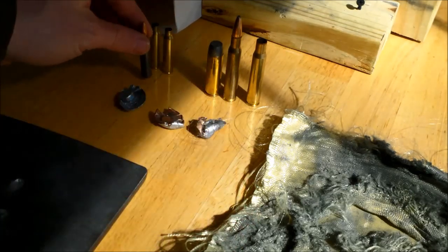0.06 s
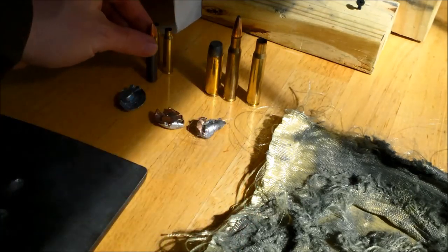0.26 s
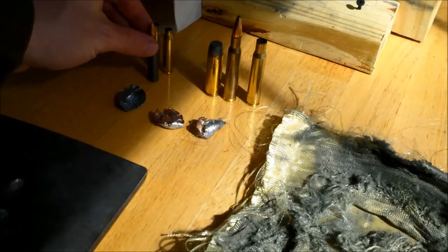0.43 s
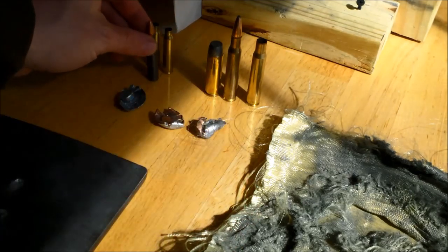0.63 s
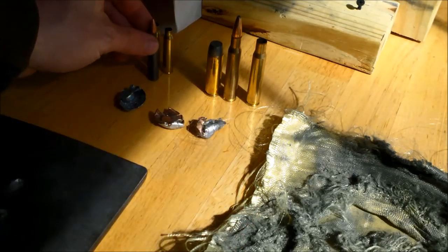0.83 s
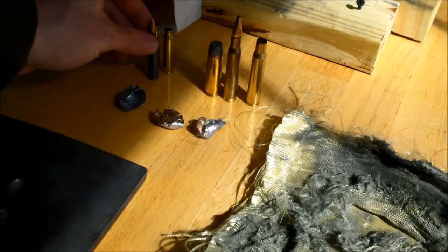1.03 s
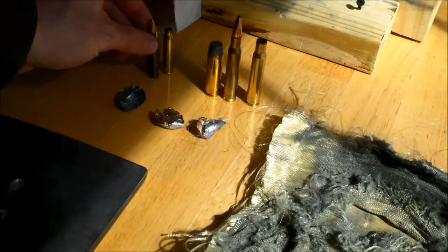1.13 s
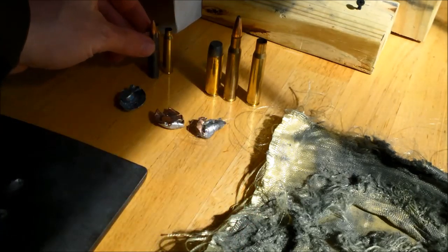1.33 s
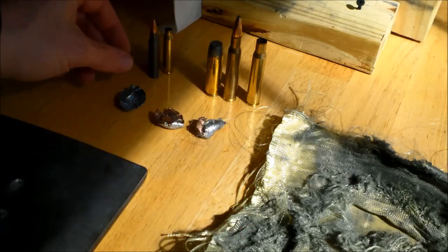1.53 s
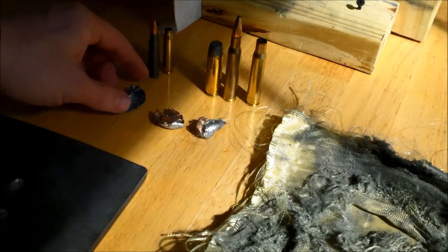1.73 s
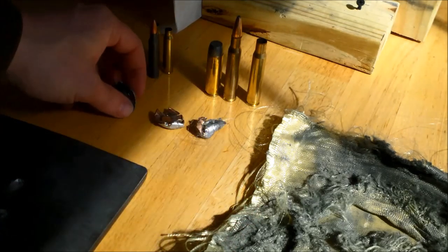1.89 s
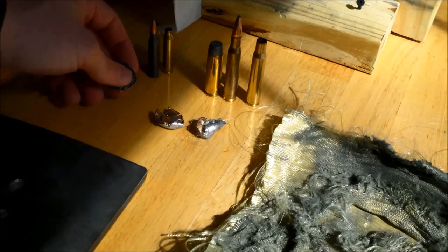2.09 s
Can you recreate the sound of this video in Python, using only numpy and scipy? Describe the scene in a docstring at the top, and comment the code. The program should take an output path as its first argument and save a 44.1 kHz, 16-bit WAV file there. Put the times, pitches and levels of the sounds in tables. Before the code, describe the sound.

Metal cartridges click, scrape and knock lightly on a wooden table in a small room.

```python
"""Cartridges on a wooden table

Cartridges and spent bullets are handled in a small, live room. Setting them down knocks the
tabletop; they slide on the wood and a hand brushes it. Metal clicks, scrapes and squeaks on metal.
A hard surface throws each bright click back, over quiet room noise and mains hum."""
import sys
import numpy as np
from scipy import signal
from scipy.fft import rfft
from scipy.io import wavfile
from scipy.ndimage import uniform_filter1d

SR = 44100
rng = np.random.default_rng(int(sys.argv[2]) if len(sys.argv) > 2 else 0)


def persist_wave(psi):
    """Save psi, clipped to +-1, as 16-bit WAV."""
    counts = np.round(np.clip(psi, -1, 1) * 32767).astype(np.int16)
    wavfile.write(sys.argv[1], SR, np.atleast_2d(counts).T)


N = 94903

# colour of the room noise: freq_hz, gain_db
ROOM_TONE_EQ = [(20, 0), (50, -14), (80, -1.5), (120, -5), (180, 0), (260, 3), (400, -5.5), (700, -8),
                (1700, -12.5), (4000, -16), (7500, -19), (8500, -18), (10000, -20), (14300, -22.5),
                (15800, -24.5)]
# mains hum and a faint high whine: pitch_hz, level_db
HUM_TONES = [(50.5, -55.5), (120, -62), (173.5, -57), (8620, -72)]
# decay of the room's tail: freq_hz, t60_s
ROOM_DECAY = [(200, 0.29), (600, 0.5), (1500, 0.39), (3000, 0.38), (6000, 0.33), (10000, 0.26),
              (15000, 0.13)]
# the hand brushing the table: start_s, length_s, level_db, bright_hz
HAND_RUBS = [(1.488, 0.028, -50.5, 710), (1.807, 0.027, -49.5, 800), (1.895, 0.146, -53, 850)]
# metal sliding over the wood: start_s, length_s, level_db, bright_hz
TABLE_SLIDES = [(0.971, .1, -51, 3240), (2.062, 0.068, -50.5, 1900), (2.115, 0.042, -48, 2010)]
# colour of a slide: freq_hz, gain_db
SLIDE_EQ = [(300, -15), (800, -7), (1200, -26), (1680, 3.5), (1890, -4.5), (2100, 1), (2320, -7), (2700, 1),
            (3250, -4), (6000, -5)]
# colour of the tabletop, struck or rubbed: freq_hz, gain_db
WOOD_EQ = [(100, -55), (220, -9), (370, -4), (470, -2.5), (560, -4), (710, -0.5), (800, -5.5), (890, 3),
           (985, -10), (1120, -2.5), (1280, 2.5), (1480, -3.5), (1650, -4.5), (1800, 2.5), (2010, -10.5),
           (2180, -0.5), (2440, -4.5), (2580, -1), (2900, -4.5), (4100, -7), (4950, -18.5), (9000, -9),
           (15000, -11)]
# ringing modes of the tabletop: pitch_hz, gain_db, t60_s
TABLE_MODES = [(348.5, 2, 0.29), (407.2, 3.5, 0.17), (718.7, 2, 0.22), (892, 6, 0.12), (1098, 1, 0.22),
               (1198, -1, 0.17), (1287, -4, 0.11), (1405, 2.5, 0.085), (1470, -2.5, 0.22),
               (1555, -0.5, 0.21), (1756, 7.5, 0.072), (1854, 1.5, .16), (2150, 4, 0.043),
               (2320, -7.5, 0.1)]
# pieces set down on the table: start_s, level_db, bright_hz, ring_db, room_db, contact_db
TABLE_KNOCKS = [(0.2460, 12.5, 3820, 1, -9, -4), (1.002, -11.5, 815, -1.5, -13, 4.5),
                (1.2424, 2.5, 2100, -1, -9.5, -5.5), (1.624, -10.5, 700, -5.5, -10, 5.5),
                (1.750, -12.5, 1630, 4.5, -4.5, -2), (1.850, -6, 980, -2.5, -4, -2),
                (2.0050, 1, 1225, -11, -10, 7), (2.015, -3, 703, -11, -5, 11.5)]
# metal scraping on metal: start_s, length_s, level_db, centre_hz, width_hz, rasp_db
METAL_SCRAPES = [(0.309, 0.044, -44, 2970, 400, -6.5), (0.374, 0.15, -43.5, 3100, 250, -5),
                 (0.412, 0.01, -35, 1350, 152, 0), (0.529, 0.0574, -40, 2980, 383, -3),
                 (0.591, 0.047, -51, 2900, 300, -23), (0.813, 0.014, -45, 2530, 350, -4),
                 (0.958, 0.016, -47.5, 2600, 350, -10), (1.551, 0.036, -39, 2530, 448, -6)]
# colour of a scrape's broad rasp: freq_hz, gain_db
RASP_EQ = [(300, -15), (1000, -27), (2500, -2), (4200, 1), (5600, 4.5), (8000, -6.5), (10000, -2),
           (13000, -19)]
# metal squeaking on metal, one curve per squeak: time_s, pitch_hz, fundamental_db, octave_db
SQUEAK_CURVES = [
    [(0.701, 5140, -57, -47), (0.712, 5280, -45, -53), (0.719, 5460, -53, -61), (0.726, 5980, -39, -49),
     (0.733, 5910, -42.5, -54), (0.738, 5680, -49, -48), (0.744, 5450, -42, -38), (0.749, 5380, -40, -35.5),
     (0.753, 5240, -39, -40), (0.756, 5450, -52, -47), (0.769, 5390, -55, -51), (0.779, 5400, -60, -65)],
    [(1.068, 6230, -61, -72), (1.077, 6010, -46, -68), (1.088, 6020, -70, -72)],
]
# colour of a click, one curve per metal piece: freq_hz, gain_db
PIECE_EQS = [
    [(300, -30.5), (800, -22.5), (1100, -14), (1340, -3), (1500, -13.5), (2050, -6), (2450, -12),
     (2750, -2.5), (2950, 4.5), (3130, -0.5), (3500, -4.5), (5000, -8.5), (5650, -5.5), (6400, -6.5),
     (7750, 0), (8750, -16.5), (10500, -0.5), (12700, -25), (15500, -24)],
    [(300, -29), (900, -20), (1350, -6), (1900, -12), (2550, 1.5), (3500, -13.5), (4700, -8), (6400, -9),
     (7000, -1), (7400, -17), (7900, -0.5), (8700, -14), (9900, -1), (10700, -1), (12000, -20),
     (15500, -27)],
    [(300, -33), (900, -20), (1400, -13.5), (1800, -19), (2450, 4), (3600, -19.5), (4450, -1.5),
     (5350, -16), (5850, -7), (6450, -19), (7050, 2.5), (7500, -16), (8000, -2.5), (8750, -21), (9450, -1),
     (10800, -9.5), (12500, -25), (15500, -32)],
]
# ringing modes of the metal pieces: piece, pitch_hz, gain_db, t60_s
PIECE_MODES = [(0, 2930, -15, 0.087), (0, 3017, -15, 0.059), (0, 5670, -18, .2), (0, 7840, -24, 0.1),
               (0, 10300, -22, 0.2), (1, 7020, -26, .1), (1, 7870, -8.5, .025), (2, 2550, -27, .08),
               (2, 4580, -15, .1), (2, 6900, -18, 0.1), (2, 9400, -22, 0.1)]
# metal striking metal: start_s, piece, level_db, room_db, echo_db, contact_s
METAL_CLICKS = [(0.4168, 0, -12, -16, -22, 0.0038), (0.4227, 0, 0, -1, -11, 0.0021),
                (0.4243, 0, 6.5, 3.5, -5, 0.0017), (0.8256, 1, -8, 2.5, -2.5, .003),
                (1.5580, 2, -7.5, 2.5, -1, 0.0012), (1.724, 2, -25.5, -11, -15, 0.0031)]

ROOM_TONE_DB, ROOM_TONE_DRIFT_DB = -48, 1
ECHO_DELAY_S, ECHO_SPREAD_S, ROOM_RISE_S = 0.0166, 0.0012, 0.009
STROKE_FADE_S, BIG_SLIPS_PER_S = 0.0078, 900
THUD_ONSET_GAIN, THUD_PEAK_S, THUD_DECAY_S = 0.79, 0.0022, 0.0087
RING_TRIM_DB, CONTACT_WIDTH_RATIO = -2.5, 0.2
SQUEAK_JITTER_RATIO, SQUEAK_CHATTER_DB, SQUEAK_FADE_S = 0.014, 1, 0.0017
CLICK_DECAY_S = 0.0014
HIGH_CUT_HZ = 15800


def amp(db):
    return 10 ** (np.asarray(db) / 20)


def seconds(size):
    return np.arange(size) / SR


def unit_energy(x):
    return x / np.sqrt(np.sum(x ** 2) + 1e-20)


def unit_rms(x):
    return unit_energy(x) * np.sqrt(len(x))


def curve_at(points, hz):
    """Read a curve along a logarithmic frequency axis."""
    freqs, values = np.transpose(points)
    return np.interp(np.log(hz + 1), np.log(freqs), values)


def add(mix, start_s, sound):
    part = mix[round(start_s * SR):][:len(sound)]
    part += sound[:len(part)]


def colour(x, db_at, size=4096):
    """Minimum-phase EQ whose gain in dB is the function db_at(hz)."""
    hz = abs(np.fft.fftfreq(size, 1 / SR))
    log_gain = np.log(amp(np.maximum(db_at(hz), -100)))
    response = np.exp(np.conj(signal.hilbert(log_gain)))
    taps = np.fft.ifft(response).real[:size // 2]
    return signal.fftconvolve(x, taps)[:len(x)]


def muffle(x, bright_hz, steepness=7.3):
    """A softer contact loses the treble."""
    return colour(x, lambda hz: -10 * np.log10(1 + (hz / bright_hz) ** steepness))


def burst(envelope, smooth_bins=195):
    """A dense cluster of tiny arrivals under an envelope, with no colour of its own."""
    noise = rng.standard_normal(len(envelope)) * envelope
    power = uniform_filter1d(abs(rfft(noise)) ** 2, smooth_bins, mode="mirror")
    freqs = np.linspace(0, SR / 2, len(power))
    return unit_energy(colour(noise, lambda hz: -10 * np.log10(np.interp(hz, freqs, power) + 1e-12)))


def mode(hz, t60, t):
    """One struck resonance: a sine that dies away."""
    return unit_energy(np.sin(2 * np.pi * hz * t) * np.exp(-np.log(1000) * t / t60))


def room_tone():
    """A bed of quiet air, each band drifting a little in level."""
    hz, _, bands = signal.stft(rng.standard_normal(N), SR, nperseg=2048, noverlap=1536)
    drift = uniform_filter1d(rng.standard_normal(bands.shape), size=14, axis=0)
    drift = uniform_filter1d(drift, size=6, axis=1)
    bands *= amp(curve_at(ROOM_TONE_EQ, hz)[:, None] + ROOM_TONE_DRIFT_DB * drift / drift.std())
    air = signal.istft(bands, SR, nperseg=2048, noverlap=1536)[1][:N]
    return amp(ROOM_TONE_DB) * unit_rms(air)


def mains_hum():
    """Steady low tones with a faint whine on top."""
    t = seconds(N)
    return sum(amp(db) * np.sqrt(2) * np.sin(2 * np.pi * (hz * t + rng.random()))
               for hz, db in HUM_TONES)


def reverb(x, size=32768):
    """Diffuse room tail that favours no single pitch, each band dying at its own speed."""
    fade = np.exp(-seconds(size) / 0.06)
    wash = burst(fade, smooth_bins=63) / fade  # steady noise, flattest where the tail is loud
    hz, t, bands = signal.stft(wash, SR, nperseg=256)
    decay = np.exp(-np.log(1000) * t / curve_at(ROOM_DECAY, hz)[:, None])
    tail = signal.istft(bands * decay, SR, nperseg=256)[1][:size]
    tail *= 1 - np.exp(-seconds(size) / ROOM_RISE_S)
    return signal.fftconvolve(x, unit_energy(tail))[:len(x)]


def in_room(x, room_db, echo_db=-10, size=32768):
    """Direct sound, the room's tail and one scattered slap off a hard surface."""
    x = np.pad(x, (0, size))
    out = x + amp(room_db) * reverb(x)
    scatter = burst(np.exp(-seconds(size) / ECHO_SPREAD_S))
    add(out, ECHO_DELAY_S, amp(echo_db) * signal.fftconvolve(x, scatter)[:len(x)])
    return out


def friction(length_s):
    """Dense small slips, with some larger ones, for the length of a stroke."""
    t = seconds(N // 8)
    grain = rng.standard_normal(len(t))
    big_slips = rng.random(len(t)) < BIG_SLIPS_PER_S / SR
    stroke = np.clip(np.minimum(t, length_s - t) / STROKE_FADE_S, 0, 1)
    return grain * (0.17 + 1.3 * big_slips) * stroke


def hand_rub(length_s, level_db, bright_hz):
    """Skin drags over the tabletop and gives a dull wooden rustle."""
    drag = muffle(colour(friction(length_s), lambda hz: curve_at(WOOD_EQ, hz)), bright_hz)
    return amp(level_db) * np.sqrt(length_s * SR) * in_room(unit_energy(drag), room_db=-10.5)


def table_slide(length_s, level_db, bright_hz):
    """Friction of a piece pushed over the tabletop excites the wood."""
    drag = muffle(colour(friction(length_s), lambda hz: curve_at(SLIDE_EQ, hz)), bright_hz)
    return amp(level_db) * np.sqrt(length_s * SR) * in_room(unit_energy(drag), room_db=-5.5)


def metal_scrape(length_s, level_db, centre_hz, width_hz, rasp_db):
    """Friction excites one resonance of the metal and a broad rasp."""
    slips = friction(length_s)
    tone = unit_energy(colour(slips, lambda hz: -20 * np.log10(1 + ((hz - centre_hz) / width_hz) ** 2)))
    rasp = unit_energy(colour(slips, lambda hz: curve_at(RASP_EQ, hz)))
    return amp(level_db) * np.sqrt(length_s * SR) * in_room(tone + amp(rasp_db) * rasp, room_db=-5)


def metal_squeak(curve):
    """Stick-slip whistle: a gliding, chattering tone and its octave."""
    times, pitch_hz, fundamental_db, octave_db = np.transpose(curve)
    t = times[0] + seconds(N // 16)
    jitter = unit_rms(uniform_filter1d(rng.standard_normal(len(t)), size=40))
    glide_hz = np.interp(t, times, pitch_hz) * (1 + SQUEAK_JITTER_RATIO * jitter)
    phase = 2 * np.pi * np.cumsum(glide_hz) / SR
    fundamental = amp(np.interp(t, times, fundamental_db)) * np.sin(phase)
    octave = amp(np.interp(t, times, octave_db)) * np.sin(2 * phase)
    chatter = unit_rms(uniform_filter1d(rng.standard_normal(len(t)), size=70))
    gate = np.clip(np.minimum(t - times[0], times[-1] - t) / SQUEAK_FADE_S, 0, 1)
    whistle = (fundamental + octave) * amp(SQUEAK_CHATTER_DB * chatter) * gate
    return in_room(whistle, room_db=0.5, echo_db=0)


def metal_click(piece, level_db, room_db, echo_db, contact_s, size=16384):
    """A sharp metal contact, with a ring that the fingers damp quickly."""
    t = seconds(size)
    contact = burst(np.exp(-np.maximum(t - contact_s, 0) / CLICK_DECAY_S), smooth_bins=63)
    crack = unit_energy(colour(contact, lambda hz: curve_at(PIECE_EQS[piece], hz)))
    ring = sum(amp(db) * mode(hz, t60, t) for owner, hz, db, t60 in PIECE_MODES if owner == piece)
    return amp(level_db) * in_room(crack + ring, room_db, echo_db)


def table_knock(level_db, bright_hz, ring_db, room_db, contact_db, size=32768):
    """A blow spreads through the tabletop and rings it; the contact sets how bright it is."""
    t = seconds(size)
    attack = THUD_ONSET_GAIN + (1 - THUD_ONSET_GAIN) * t / THUD_PEAK_S
    decay = np.exp(-(t - THUD_PEAK_S) / THUD_DECAY_S)
    blow = burst(np.where(t < THUD_PEAK_S, attack, decay))
    thud = unit_energy(colour(blow, lambda hz: curve_at(WOOD_EQ, hz)))
    ring = sum(rng.choice([-1, 1]) * amp(db) * mode(hz, t60, t) for hz, db, t60 in TABLE_MODES)
    knock = thud + amp(RING_TRIM_DB + ring_db) * unit_energy(ring) + amp(room_db) * reverb(thud)
    # contact resonance: a bump or dip where the treble starts to roll off
    knock = colour(knock, lambda hz: contact_db / (1 + ((hz / bright_hz - 1) / CONTACT_WIDTH_RATIO) ** 2))
    return amp(level_db) * muffle(knock, bright_hz)


def scene():
    """Lay every knock, click and stroke over the room's bed, in mono."""
    mix = room_tone() + mains_hum()
    layers = ((table_knock, TABLE_KNOCKS), (metal_click, METAL_CLICKS), (metal_scrape, METAL_SCRAPES),
              (table_slide, TABLE_SLIDES), (hand_rub, HAND_RUBS))
    for source, cues in layers:
        for start_s, *settings in cues:
            add(mix, start_s, source(*settings))
    for curve in SQUEAK_CURVES:
        add(mix, start_s=curve[0][0], sound=metal_squeak(curve))
    return mix[None]


def record(dry):
    """A steep high cut takes off the very top of the mix."""
    high_cut = signal.firwin(511, HIGH_CUT_HZ, window=("kaiser", 9), fs=SR)
    return signal.oaconvolve(dry, high_cut[None], "same")


dry = scene()
out = record(dry)
persist_wave(out)
```